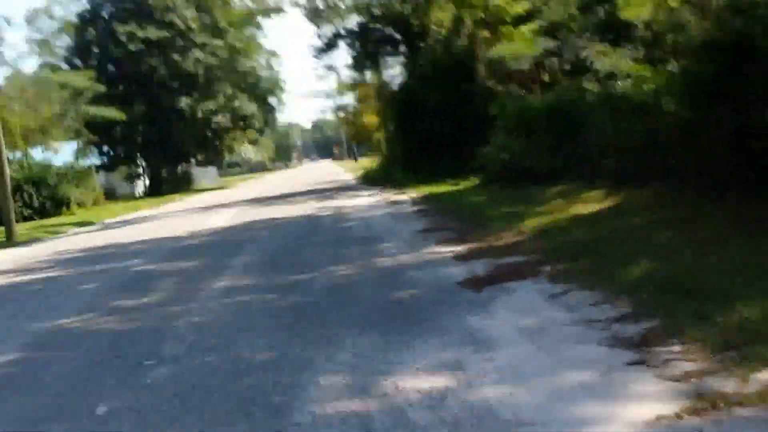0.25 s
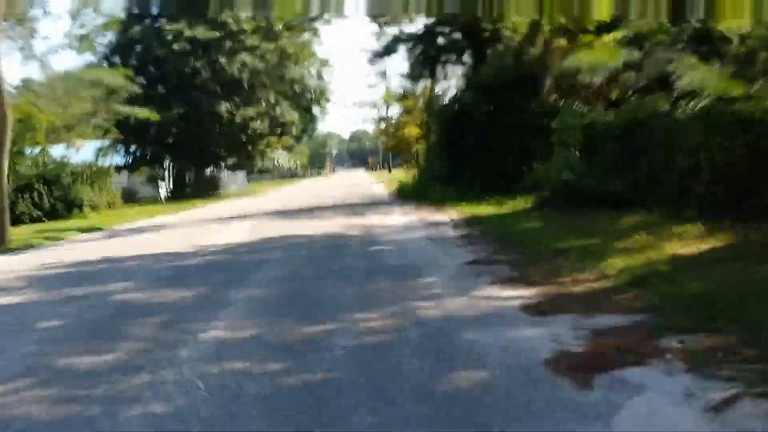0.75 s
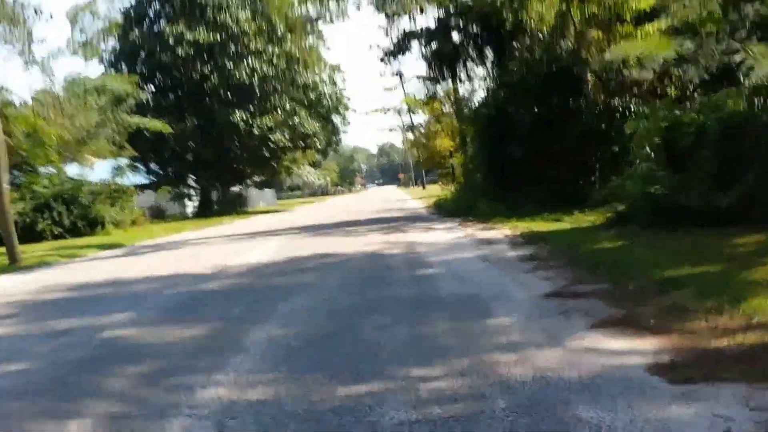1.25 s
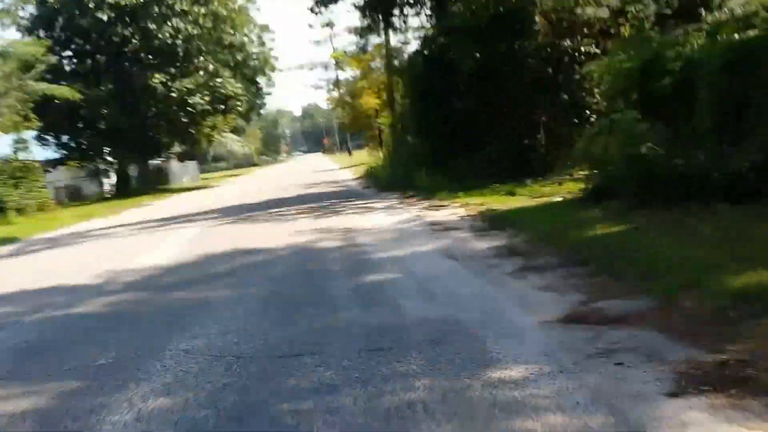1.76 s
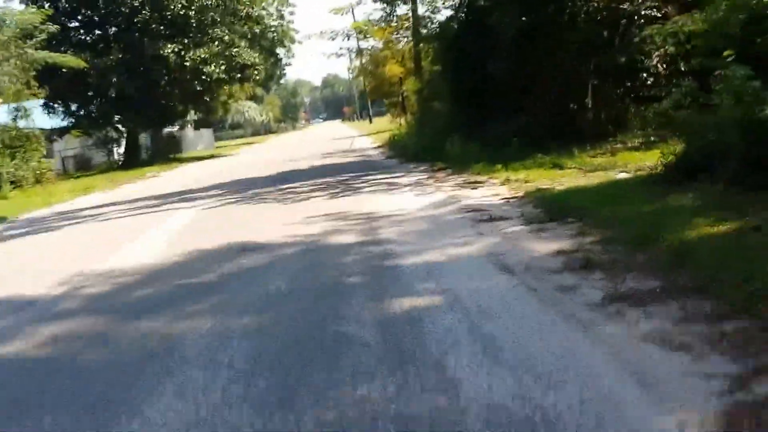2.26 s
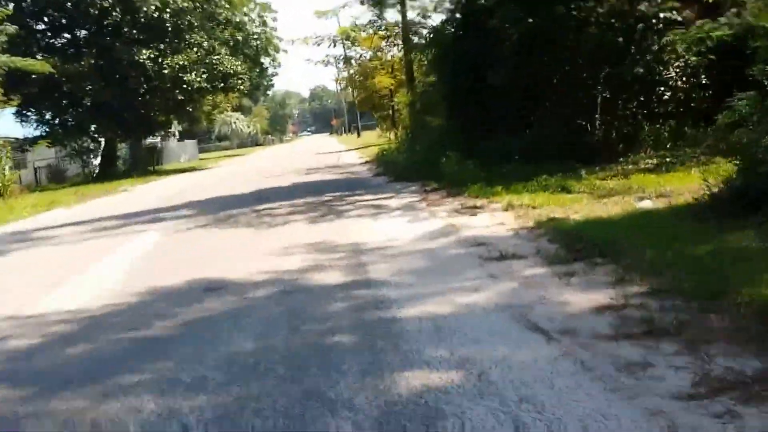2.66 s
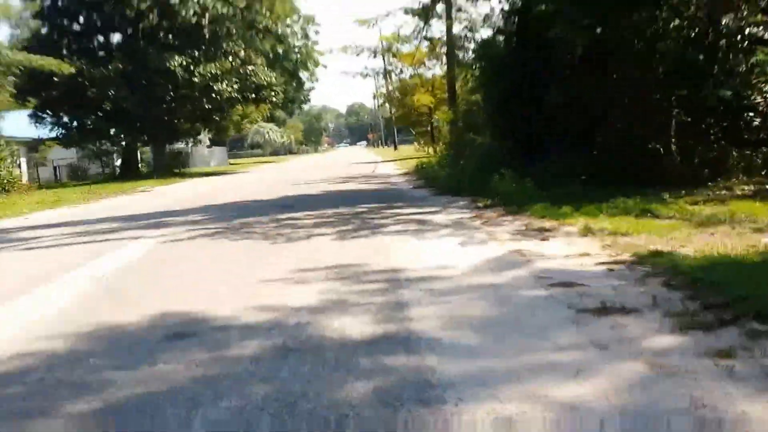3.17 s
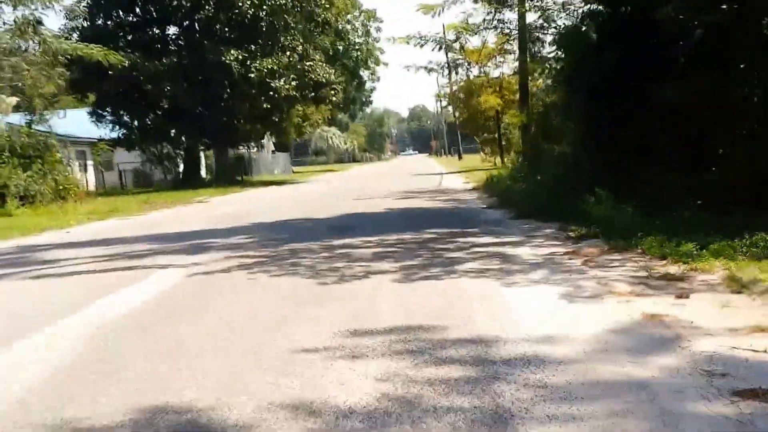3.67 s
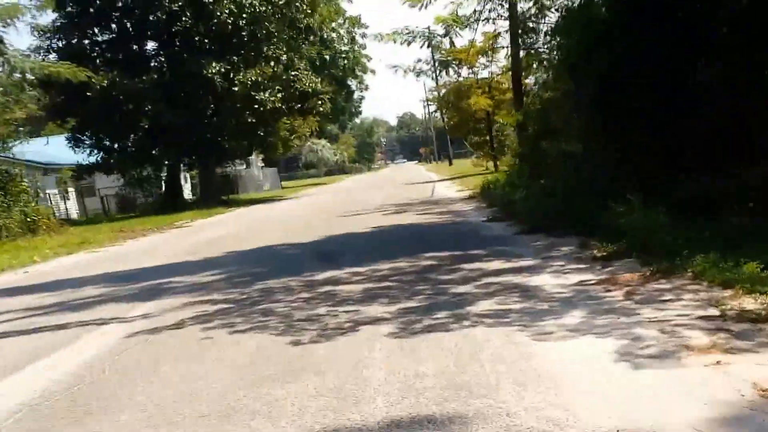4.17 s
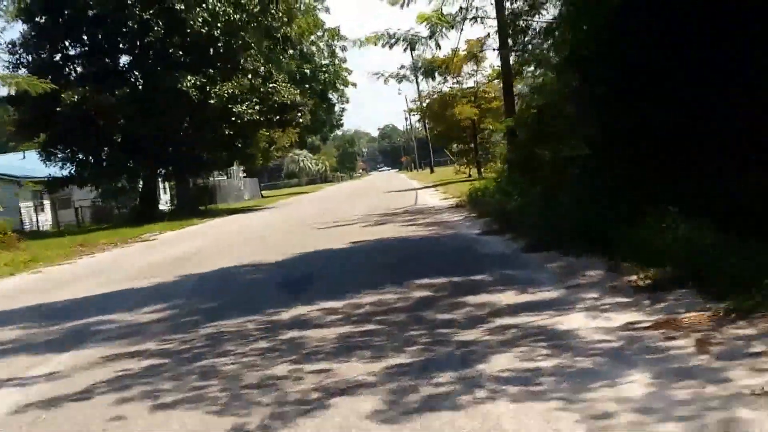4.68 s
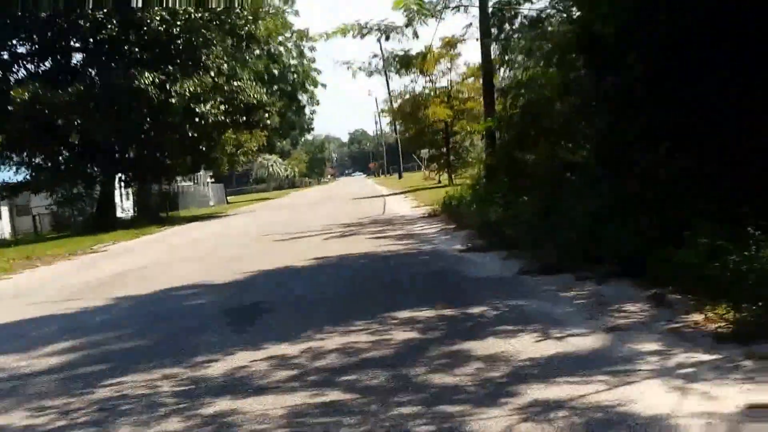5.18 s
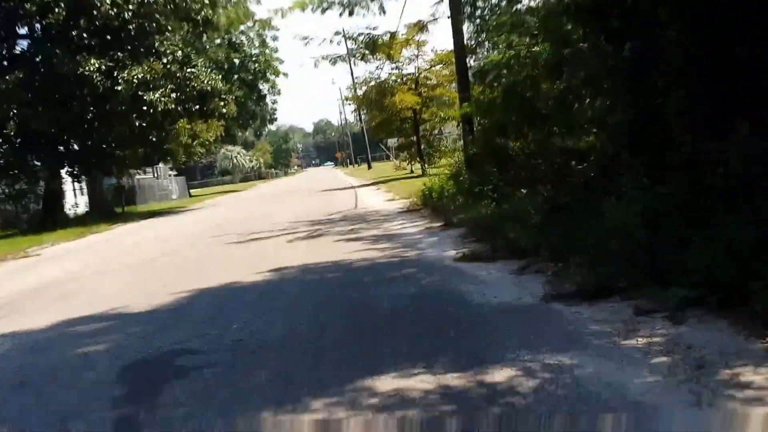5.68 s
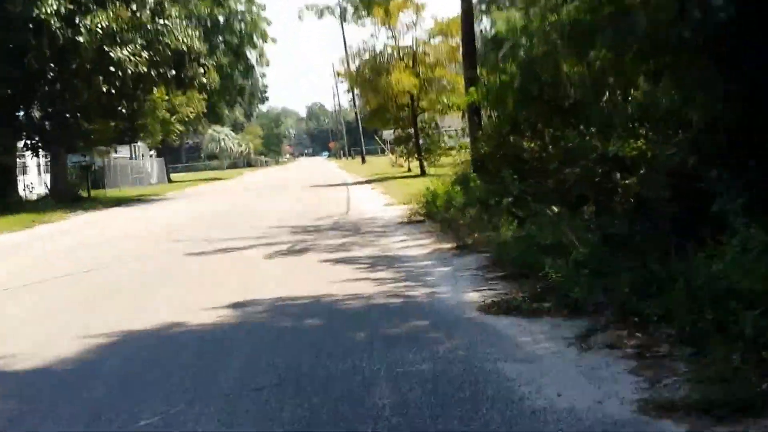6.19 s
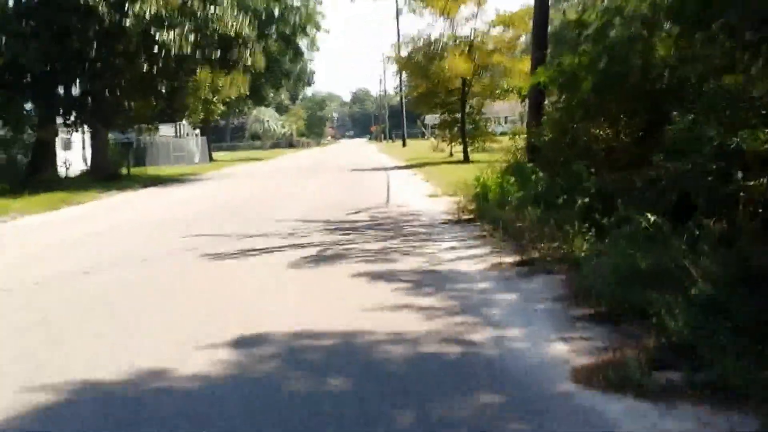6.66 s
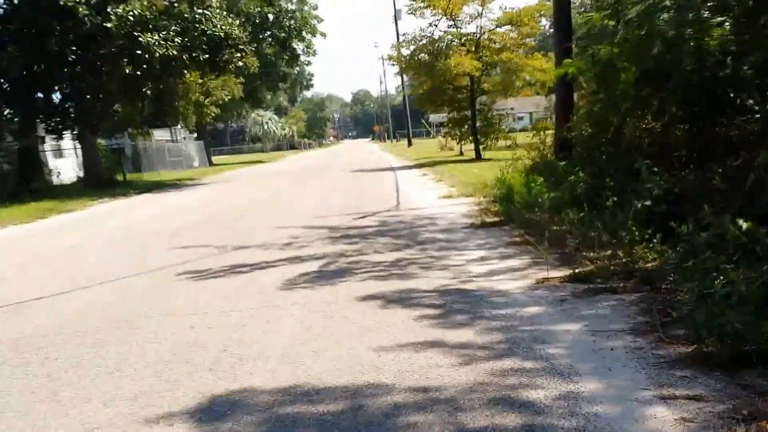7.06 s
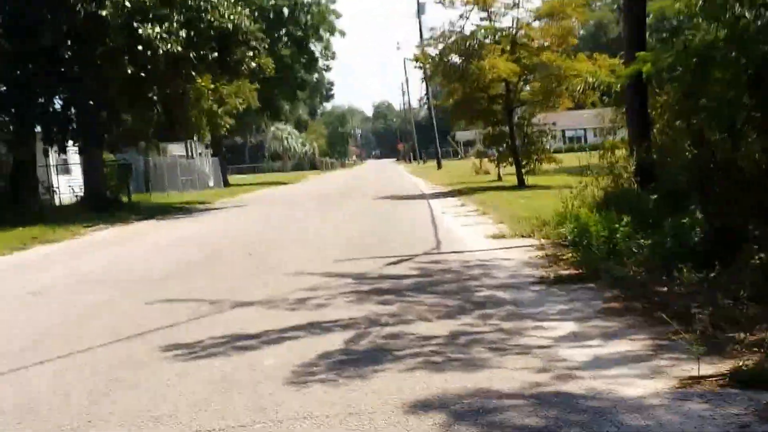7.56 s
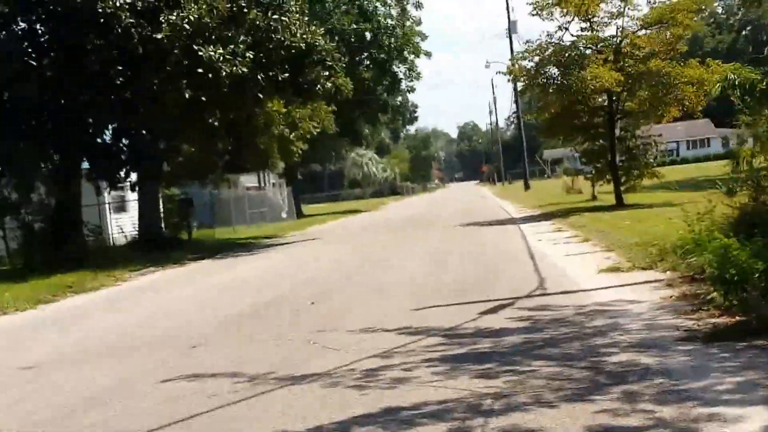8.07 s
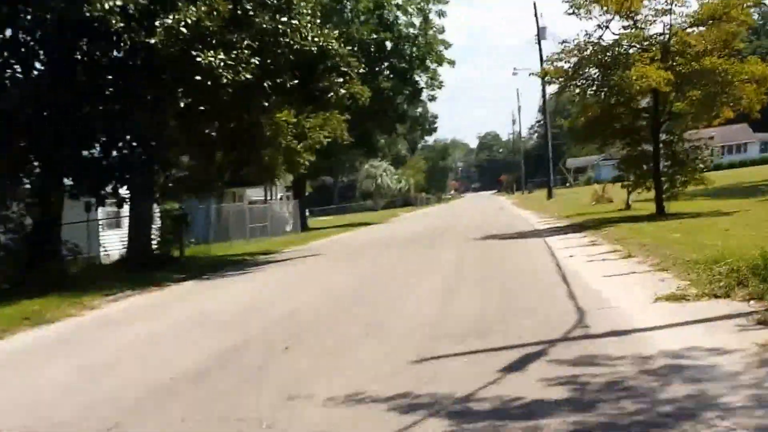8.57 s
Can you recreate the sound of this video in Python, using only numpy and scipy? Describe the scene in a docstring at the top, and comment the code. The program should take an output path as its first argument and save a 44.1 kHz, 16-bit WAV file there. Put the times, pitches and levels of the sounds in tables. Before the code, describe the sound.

Steady low road rumble from a moving bike, with irregular knocks, chattering loose parts and a faint high insect hum.

```python
"""A camera on a rolling bicycle

Rough asphalt shakes the frame, which booms into the left microphone while tyre and housing buzz.
The camera's loose mount knocks and chatters, each impact exciting the damped modes of the housing;
small loose parts tick and rattle, and grit snaps. Insects sing in the bushes passing on the right."""
import sys
import numpy as np
from scipy import signal
from scipy.io import wavfile
from scipy.ndimage import uniform_filter1d

SR = 44100
rng = np.random.default_rng(int(sys.argv[2]) if len(sys.argv) > 2 else 0)


def put_to_file(sound):
    """Save the sound as 16-bit audio at rate SR, in the file named by the first command-line argument."""
    columns = np.atleast_2d(sound).T  # one column per channel
    safe = np.clip(columns, -1, 1)
    whole_steps = np.round(safe * 32767)
    wavfile.write(sys.argv[1], SR, whole_steps.astype(np.int16))


N = 389403

# Shaking of the frame by the road. Each row: time in seconds, level in dB.
FRAME_SHAKE = [(0.0, -19), (0.07, -17.5), (1.8, -12.5), (2.8, -16), (3.0, -12), (3.68, -15.5),
               (3.89, -10.5), (4.01, -15.5), (4.45, -13), (5.37, -27.5), (5.56, -15), (5.8, -23),
               (5.88, -15.5), (8.47, -12.5), (8.76, -25), (8.83, -18)]
# Spectrum of the booming frame and clamp. Each row: frequency in Hz, relative density in dB.
BOOM_SPECTRUM = [(25, -82), (58, -16), (94, -4.5), (162, 1), (211, 1), (249, -12.5), (290, -14.5),
                 (380, -13.5), (428, -12), (458, -26.5), (520, -19), (680, -33.5), (1140, -120)]
# Spectrum of the buzzing tyre and housing. Each row: frequency in Hz, relative density in dB.
BUZZ_SPECTRUM = [(260, -20.5), (450, -9.5), (691, 1.5), (930, -2), (1580, -10), (3580, -24), (7390, -23),
                 (8570, -23), (14000, -31), (15500, -44)]
# Colour of the road noise at the right microphone. Each row: frequency in Hz, relative gain in dB.
RIGHT_COLOUR = [(60, 12.5), (110, 7), (145, 0), (200, 0), (380, 1), (700, 0.5), (1290, 7.5), (2400, 11.5),
                (4400, 13), (12000, 6.5)]
# Likeness of left and right road noise. Each row: frequency in Hz, correlation from -1 to 1.
CORRELATION = [(60, -0.52), (250, 0.16), (400, -0.23), (750, 0.93), (1290, 1), (2400, 0.29), (5000, 0.023)]
# Modes of the housing. Each row: frequency in Hz, relative level in dB, time to decay by 60 dB in
# seconds, left minus right in dB.
HOUSING_MODES = [(176, 0, 0.06, 11), (413, -3, 0.041, 13), (627, 5, 0.017, 37), (784, 0.5, 0.014, 18.5),
                 (1270, 3, 0.018, 7.5), (1535, 2, 0.02, 13), (2580, 9, 0.019, 12), (3900, 0, 0.0054, 5.5),
                 (4840, 2.5, 0.0088, 7.5), (5860, -5.5, 0.0028, -5), (8240, -12, 0.0015, -23.5),
                 (9700, 0, 0.0018, 22)]
# Loud knocks of the mount. Each row: start in seconds, level in dB, weights of the middle and of the
# upper modes against the low ones in dB.
MOUNT_KNOCKS = [(0.0378, -12.5, -6, -16), (0.1554, -20.5, -7, -14), (0.393, -15, -8, -17),
                (0.5206, -11, -2, -6.0), (0.752, -10.5, 1, -6), (0.9366, -12.0, -10.0, -15),
                (1.029, -15, -15, -25), (1.0679, -10.4, 2.5, -4), (1.1071, -9.5, -1, -16),
                (1.1893, -11, -16, -25.0), (1.2414, -13, -1, 2.0), (1.2622, -10, -12, -16),
                (1.283, -9.5, -7, -14), (1.3304, -9.9, 8, -2), (1.592, -15.5, -8, -11),
                (1.6989, -14.5, -21, -33), (1.8393, -7.5, -6, -6), (1.884, -14, -9, -13),
                (1.924, -9.5, -4, -16.5), (2.1649, -12.5, -15, -27), (2.203, -12, 7, -2),
                (2.407, -12, 1, -10), (2.4306, -13.5, -5.0, -13), (2.534, -13, -3, -19),
                (2.9876, -13, 10, -14), (3.0159, -9, -11, -15.0), (3.0576, -11.5, -7, -17),
                (3.0758, -8.5, -4, -10), (3.1661, -13, 1, -16), (3.2135, -17, -3, -14),
                (3.3364, -11.3, -5, -11), (3.3539, -17, 0.0, 12), (3.5207, -17, 0, -16),
                (3.7201, -14.5, -11, -8), (3.902, -11, -6.5, -17.5), (4.2516, -15.5, -4, -20),
                (4.3539, -8.5, -11, -14), (4.7409, -11, -15, -36), (5.021, -27, -19, -29),
                (5.226, -21, -1.5, -9), (5.561, -10.5, -1, -16), (5.6067, -15.5, -8.5, -16),
                (5.6455, -13.5, -7.0, -5), (5.858, -14.5, -0.5, -13), (5.8869, -14, -13, -26),
                (5.9568, -16, -9, -19), (6.013, -14, -4, -9), (6.048, -14.5, -7, -21),
                (6.0894, -10.5, -13, -27), (6.137, -10.5, -6, -31), (6.1536, -22.5, 2, -21),
                (6.1909, -13, -13, -17), (6.6367, -9, -13, -29), (6.6534, -8.5, -3, -9),
                (6.6758, -9.0, -17, -15), (6.6939, -13, 14, -5), (6.7845, -11.5, -7.5, -23),
                (6.814, -14, -16, -21), (6.961, -7.5, 3, -3.5), (7.0248, -8.5, -28, -43),
                (7.3907, -10, -16, -25), (7.5234, -7, 2, -11.5), (7.5863, -12, -3, -17),
                (7.6913, -11.5, -3, -13), (7.7195, -14, -1, -11), (7.9084, -9, -14, -15.0),
                (7.9451, -12, -13, -18), (8.1996, -13, 1, -13), (8.3441, -9.2, 3, -6),
                (8.3687, -11, -4.0, -9), (8.388, -10, 1.0, -3), (8.41, -14.5, 2, -14),
                (8.451, -18.5, -7.0, -12), (8.4669, -21, 6, -19)]
# Loud ticks of small loose parts. Each row: start in seconds, left level in dB, leftward pan in dB.
PART_TICKS = [(0.1544, -13.5, -2), (0.393, -17, 2), (0.4176, -18.5, -6.5), (0.442, -18, -4),
              (0.547, -21.5, -6), (0.5682, -20, 0), (0.671, -17.5, 8), (0.706, -21, -3), (0.73, -10, 4.5),
              (0.85, -12.5, 4), (0.9544, -10, 1), (1.2381, -10, 3), (1.2823, -7, 7), (1.387, -18.5, 15),
              (1.4323, -12.5, 2), (1.7593, -16, -8.5), (1.983, -11, 13), (2.233, -11, -2),
              (2.31, -11.5, -6), (2.389, -16, 6), (2.407, -10, 14), (2.591, -14.5, 2), (2.775, -16.5, 4),
              (2.942, -14.5, 17), (2.9873, -12.5, 14), (3.0616, -9.5, 4.5), (3.126, -12.5, 15),
              (3.179, -10.5, -6), (3.2148, -9.5, 1), (3.262, -15.5, -2), (3.355, -6.5, 9), (3.404, -14, 13),
              (3.509, -20, -13), (3.573, -19, -11), (3.633, -16.5, -6.5), (3.6775, -17, -10),
              (4.348, -11.5, -6.5), (4.795, -28, -14), (4.838, -23.5, -14), (5.4923, -26, -13),
              (5.533, -8, 6), (5.5812, -12, 10), (6.153, -6.5, 3.5), (6.202, -15, 6), (6.6959, 0.5, 6),
              (7.3354, -16, 5), (7.3628, -12, -8.5), (7.459, -15, 14), (7.5852, -9.5, 6), (7.7183, -14, 5),
              (7.9464, -6, 4.5), (7.997, -21, 3), (8.1544, -16, 4), (8.3867, -7, 3), (8.431, -12, 9),
              (8.4667, -5.5, 5.5), (8.773, -17, 11)]
# Bright snaps of grit. Each row: start in seconds, left peak in dB, left minus right in dB,
# tilt towards the treble in dB per octave.
GRIT_SNAPS = [(0.7781, -15, 24, -5), (0.817, -20, 20, 4), (1.1748, -6, 21, -16.5), (1.5678, -21, 14, 0),
              (1.729, -17, 19, -10), (1.9078, -15, 22, -11), (3.588, -17, 14, 1), (3.8731, -22, 12, 7),
              (4.6368, 9, 29, -4.5), (4.916, -12, 9, -40), (5.5212, -13.5, 9, -10), (5.76, -15.5, 5, -44),
              (6.316, -16.5, 19, 13), (6.7443, -15, 16, -13), (7.4648, -9, 25, 9), (7.556, -18, 18, -3),
              (7.8685, -24, 15, 9), (7.9513, -14, 19, 3), (8.1189, -26, 15, 13), (8.6116, 7.5, 33, -2)]
# Modes of a snap. Each row: frequency in Hz, relative level in dB.
SNAP_MODES = [(3300, -26.5), (5000, -8.5), (6700, -2), (9600, 2), (11700, -2.5), (13800, -4)]
# Swell of the insect chorus as two stands of bushes go by. Each row: time in seconds, base level in dB.
CHORUS_SWELL = [(0.0, -86), (0.95, -62.5), (3.9, -65.5), (4.43, -52.5), (5.2, -67), (5.7, -58), (6.3, -51),
                (7.84, -51.5), (8.83, -63)]

SWINGS_PER_S = 21.5  # the loose mount lands twice in each swing


def gain_of(db):
    return 10 ** (np.asarray(db) / 20)


def unit_rms(x):
    return x / np.sqrt(np.mean(x ** 2) + 1e-20)


def over_frequency(rows, hz):
    row_hz, values = np.transpose(rows)
    return np.interp(np.log(hz + 1), np.log(row_hz + 1), values)


def over_time(rows):
    return np.interp(np.arange(N) / SR, *np.transpose(rows))


def filtered(x, order, hz, kind="lowpass"):
    return signal.sosfilt(signal.butter(order, hz, kind, fs=SR, output="sos"), x)


def add(mix, start_s, sound):
    part = mix[:, round(start_s * SR):][:, :sound.shape[1]]
    part += sound[:, :part.shape[1]]


def flicker(smoothing_s):
    """Averaging white noise twice leaves a slower fluctuation, scaled to unit rms."""
    width = int(smoothing_s * SR)
    return unit_rms(uniform_filter1d(uniform_filter1d(rng.standard_normal(N), width), width))


def vibration(spectrum, window, patchy_db):
    """Random forcing gives coloured noise, partly coherent between the two microphones."""
    frames, hz = 4 * N // window + 5, np.fft.rfftfreq(window, 1 / SR)
    a, b, c, d, patches = rng.standard_normal((frames, len(hz), 5)).T
    patches = unit_rms(uniform_filter1d(uniform_filter1d(patches, size=6, axis=0), size=6, axis=1))
    likeness = np.clip(over_frequency(CORRELATION, hz), -1, 1)[:, None]
    left = a + 1j * b
    right = likeness * left + np.sqrt(1 - likeness ** 2) * (c + 1j * d)
    right *= gain_of(over_frequency(RIGHT_COLOUR, hz))[:, None]
    spectra = np.array([left, right]) * gain_of(over_frequency(spectrum, hz)[:, None] + patchy_db * patches)
    out = signal.istft(spectra, nperseg=window, noverlap=3 * window // 4)[1][:, :N]
    return out / np.std(out[0])


def road(contacts, lift_db=5, lift_s=0.0097, flare_t60_s=0.022, grains_per_s=35):
    """Forced vibration: bumps modulate a boom, a dull buzz and a thin hiss pricked by grit."""
    shake_db, jolts = over_time(FRAME_SHAKE), flicker(0.0088)
    # The shaking fades while the mount is lifted off, just before it lands.
    ramp = np.linspace(1, 0, int(lift_s * SR))
    lifted = signal.oaconvolve((contacts / gain_of(shake_db))[::-1], ramp)[:N][::-1]
    grip = gain_of(-lift_db * np.minimum(lifted, 1))
    boom = grip * gain_of(shake_db + 3.26 * jolts) * vibration(BOOM_SPECTRUM, 4096, patchy_db=-0.9)
    # The dull buzz flares after each contact.
    flare = signal.lfilter([1], [1, -gain_of(-60 / (flare_t60_s * SR))], contacts)
    flare = uniform_filter1d(flare, size=90, origin=44)
    buzz_gain = gain_of(-25 + 0.82 * shake_db)
    buzz = vibration(BUZZ_SPECTRUM, 512, patchy_db=2)
    dull = filtered(buzz, 2, 2800)
    chance, size = rng.random((2, N))
    grains = (chance < grains_per_s / SR) * gain_of(0.5 + 14.1 * size)
    grit = np.convolve(grains, np.hanning(70), "same")
    lows = (grip ** 2 * buzz_gain * gain_of(3 * jolts - 5) + gain_of(-7) * flare) * dull
    hiss = buzz_gain * gain_of(3.15 * jolts - 1) * (1 + grit) * (buzz - dull)
    return (boom + lows + hiss) * gain_of([[0], [-13]])


def impact(weight_db, crack_db, crack_s, left_lag_samples=6):
    """Impulse response: the housing rings in damped modes, and the contact adds a broadband crack."""
    t = np.arange(1300) / SR
    hz, db, t60, pan_db = np.array(HOUSING_MODES).T[:, :, None]
    hz = hz * (1 + 0.03 * rng.standard_normal(hz.shape))
    db = db + weight_db(hz) + 4.7 * rng.standard_normal(hz.shape)
    phase = 1.09 * rng.standard_normal(hz.shape) + 0.5 * rng.standard_normal((2, *hz.shape))
    attack = 1 - np.exp(-t / 0.00011)
    rings = gain_of(db - 60 * t / t60) * np.sin(2 * np.pi * hz * t + phase) * attack
    rings[1] *= gain_of(-pan_db)
    ring_peak = abs(rings[:, 2:].sum(1).mean(0)).max()  # without the two lowest modes
    shared, left, right = filtered(rng.standard_normal((3, len(t))), 1, [2400, 7500], "bandpass")
    crack = (shared + 2 * np.array([left, right])) * t * np.exp(-t / crack_s) * gain_of([[0], [-5]])
    both = rings.sum(1) / ring_peak + gain_of(crack_db) * crack / abs(crack[0]).max()
    fade = np.minimum(1, (t[-1] - t) / 0.015)
    return np.array([np.roll(both[0], left_lag_samples), both[1]]) * fade


def knock(middle_db, upper_db):
    """The point of impact sets how strongly the middle and upper modes ring beside the low ones."""
    corners_hz = [900, 1100, 1800, 2300, 3020, 4560]
    weights_db = [0, middle_db, middle_db, upper_db, upper_db, upper_db - 3]
    return impact(lambda hz: np.interp(np.log(hz), np.log(corners_hz), weights_db),
                  crack_db=0.5 * upper_db - 24, crack_s=0.0011)


def chatter(scatter_swings=0.3, rest_s=0.017):
    """Oscillation with play: after each loud knock the mount swings, landing lightly at both ends."""
    out, contacts, shake_db = np.zeros((2, N)), np.zeros(N), over_time(FRAME_SHAKE)
    starts = [0] + [row[0] for row in MOUNT_KNOCKS] + [N / SR]
    knocks = [knock(0.68 * upper_db + 4.5, upper_db) for upper_db in np.linspace(-24, -4, 20)]
    for start, end in zip(starts[:-1], starts[1:]):
        for landing, (shift, size, pick) in enumerate(rng.random((24, 3)), start=1):
            landing_s = start + (landing / 2 + scatter_swings * (shift - 0.5)) / SWINGS_PER_S
            if landing_s < end - rest_s:
                sample = int(landing_s * SR)
                strength = gain_of(shake_db[sample] - 14 + 10.5 * size)
                add(out, landing_s, strength * knocks[int(pick * len(knocks))])
                contacts[sample] += strength
    return out, contacts


def tick(centre_hz, scrape_s):
    """Inelastic rebound: a small part excites the modes near one pitch, then bounces twice, weaker."""
    late, weak, stretch, later, weaker = rng.random(5)
    strike = impact(lambda hz: -np.minimum(1.7 * abs(np.log2(hz / centre_hz)), 40),
                    crack_db=-2.5, crack_s=scrape_s * (1 + stretch))
    strike = filtered(strike, 1, 600, "highpass")
    strike /= abs(strike[0]).max()
    out = strike.copy()
    add(out, 0.0037 + 0.0018 * late, gain_of(-4.5 - 26 * weak) * strike)
    add(out, 0.0097 + 0.004 * later, gain_of(-12.5 - 51 * weaker) * strike)
    return out


def rattle(count, base_db, spread_db):
    """Driven rattling: faint ticks cluster around the loud ones, roughly whole half swings away."""
    out = np.zeros((2, N))
    ticks = [tick(hz, 0.00085) for hz in np.geomspace(2400, 11000, 16)]
    for parent, away, size, pick, side, shift in rng.random((count, 6)):
        parent_s = PART_TICKS[int(parent * len(PART_TICKS))][0]
        half_swings = np.round(6 * (away - 0.45)) + 0.5 * (shift - 0.5)
        start_s = np.clip(parent_s + half_swings / (2 * SWINGS_PER_S), 0, N / SR)
        db = base_db - spread_db * np.log(size + 0.027)
        add(out, start_s, gain_of([[db], [db - 2.5 - 5.7 * side]]) * ticks[int(pick * len(ticks))])
    return out


def snap(tilt_db, length_s=0.0012):
    """Superposition: high modes, neighbours in opposite phase, sum to one brief snap of grit."""
    t = np.arange(int(length_s * SR)) / SR
    hz, db = np.array(SNAP_MODES).T[:, :, None]
    signs = (-1) ** np.arange(len(hz))[:, None]
    amplitudes = signs * gain_of(db + tilt_db * np.log2(hz / hz[0]))
    ring = (amplitudes * np.sin(2 * np.pi * hz * (t - length_s / 2))).sum(0) * np.hanning(len(t))
    return (ring / abs(ring).max())[None]


def loud_impacts():
    """Impulsive excitation: knocks, ticks and snaps, with an impulse train marking knocks and ticks."""
    out, contacts = np.zeros((2, N)), np.zeros(N)
    for start_s, db, middle_db, upper_db in MOUNT_KNOCKS:
        add(out, start_s, gain_of(db) * knock(middle_db, upper_db))
        contacts[round(start_s * SR)] = gain_of(db)
    for start_s, db, pan_db in PART_TICKS:
        # The part on the left rings lower; the one on the right scrapes longer.
        hz, scrape_s = (4870, 0.0006) if pan_db > 4.5 else (5900, 0.0013)
        add(out, start_s, gain_of([[db], [db - pan_db]]) * tick(hz, scrape_s))
        contacts[round(start_s * SR)] += gain_of(db + 2.5)
    for start_s, db, pan_db, tilt_db in GRIT_SNAPS:
        add(out, start_s, gain_of([[db], [db - pan_db]]) * snap(tilt_db))
    return out, contacts


def insect_chorus(centre_hz=8440, sink_from_s=7.2, sink_hz_per_s=190):
    """Many distant voices merge into narrowband noise, whose centre sinks once the bushes are behind."""
    in_phase, quadrature = filtered(rng.standard_normal((2, 2, N)), 3, 400)
    hz = centre_hz - sink_hz_per_s * np.maximum(np.arange(N) / SR - sink_from_s, 0)
    phase = 2 * np.pi * np.cumsum(hz) / SR
    chorus = unit_rms(in_phase * np.cos(phase) + quadrature * np.sin(phase))
    sides_db = np.array([[1.5], [4.5]])
    return chorus * gain_of(over_time(CHORUS_SWELL) + 3.5 * flicker(0.0012) + sides_db)


def near_insect(hz=8130, passing_s=6.36, swell_s=0.12, level_db=-49):
    """A randomly modulated carrier: one narrow buzz swells and fades as its bush goes by."""
    t = np.arange(N) / SR
    in_phase, quadrature = filtered(rng.standard_normal((2, N)), 2, 90)
    phase = 2 * np.pi * hz * t
    buzz = unit_rms(in_phase * np.cos(phase) + quadrature * np.sin(phase))
    return gain_of(level_db) * np.exp(-((t - passing_s) / swell_s) ** 2) * buzz


def scene():
    """The sources add linearly; the contacts of mount and parts also modulate the road noise."""
    loud, loud_contacts = loud_impacts()
    light, light_contacts = chatter()
    bicycle = road(loud_contacts + light_contacts) + loud + light
    return bicycle + rattle(count=250, base_db=-47, spread_db=9.5) + insect_chorus() + near_insect()


def record(dry):
    """Band limiting and saturation: the input cuts deep bass, rounds peaks and loses the top treble."""
    thinned = filtered(dry, 2, 45, "highpass")
    saturated = thinned / (1 + abs(thinned) ** 4) ** (1 / 4)
    dulled = filtered(saturated, 14, 14400)
    band_limit = signal.firwin(511, 15850, window=("kaiser", 9), fs=SR)
    return signal.oaconvolve(dulled, band_limit[None], "same")


dry = scene()
out = record(dry)
put_to_file(out)
```